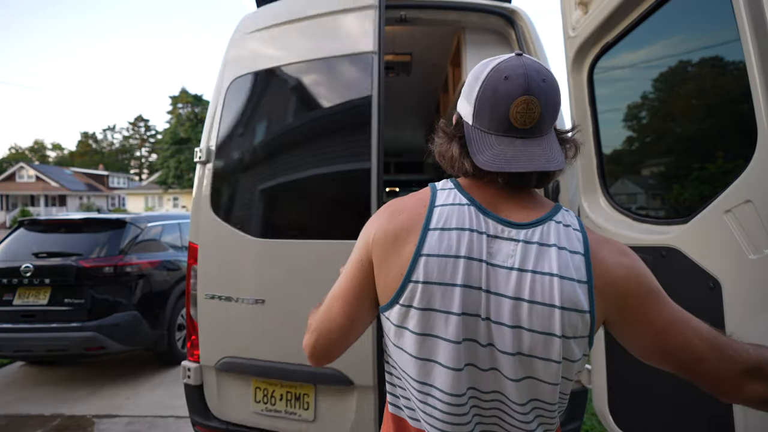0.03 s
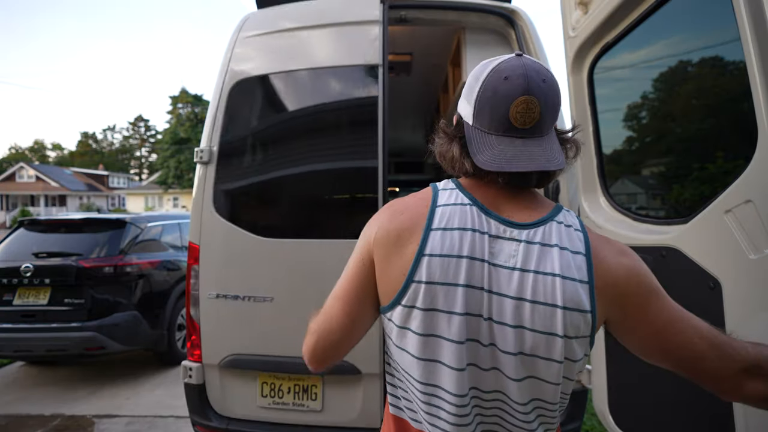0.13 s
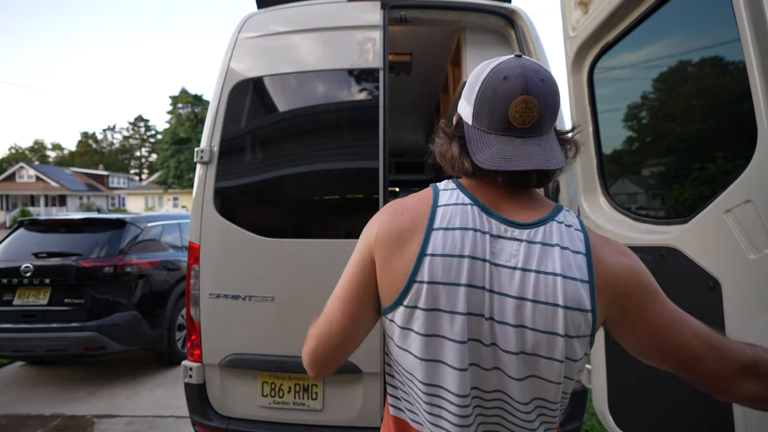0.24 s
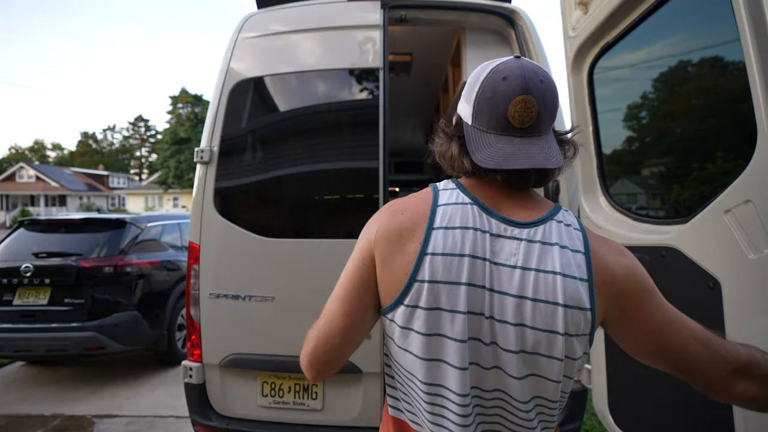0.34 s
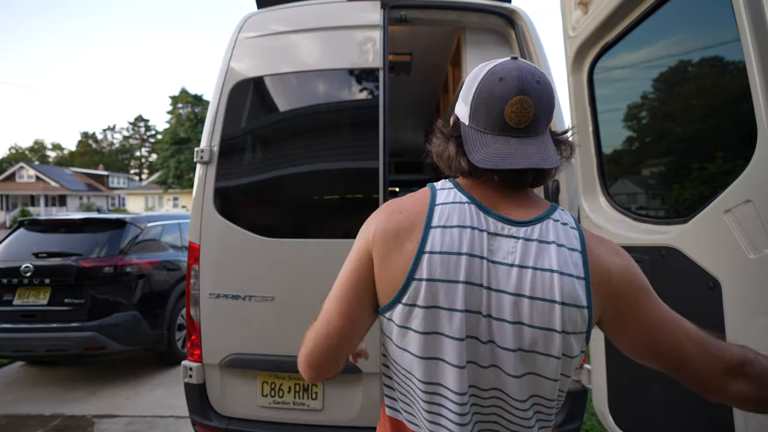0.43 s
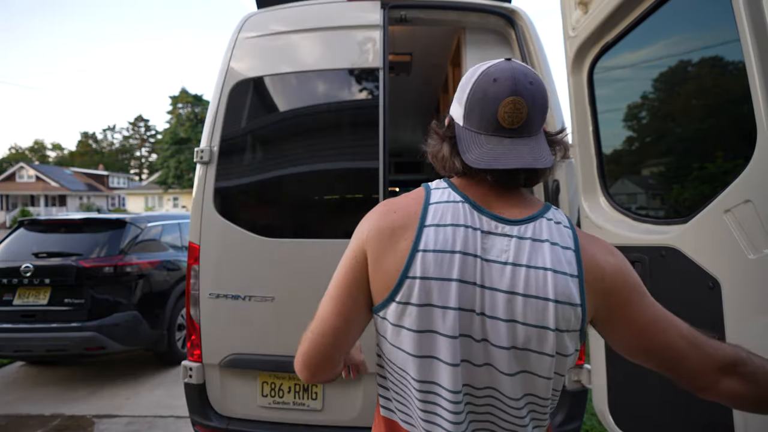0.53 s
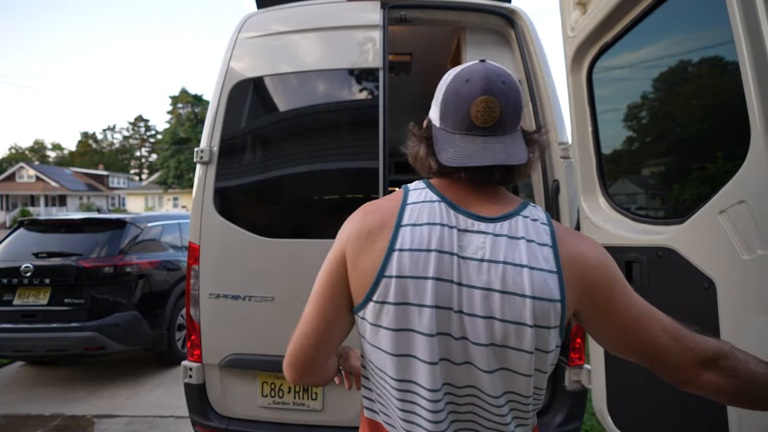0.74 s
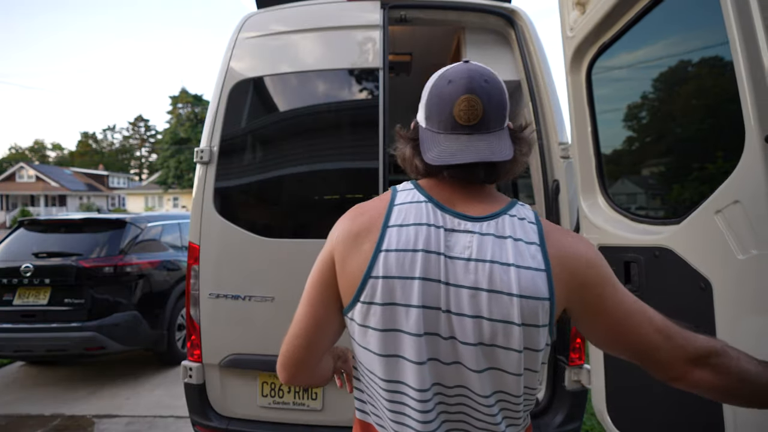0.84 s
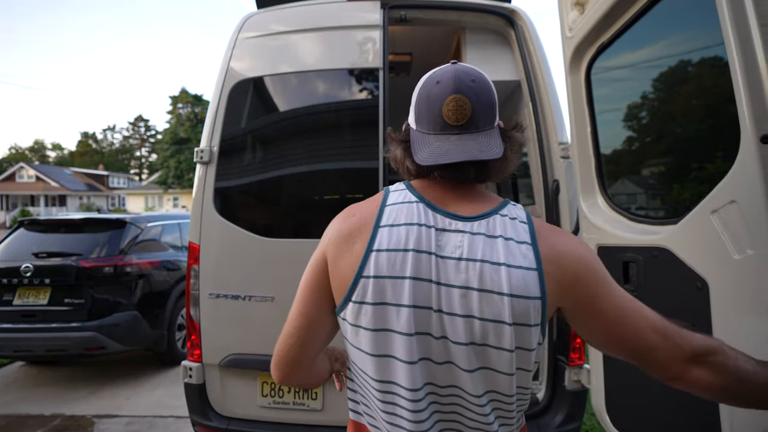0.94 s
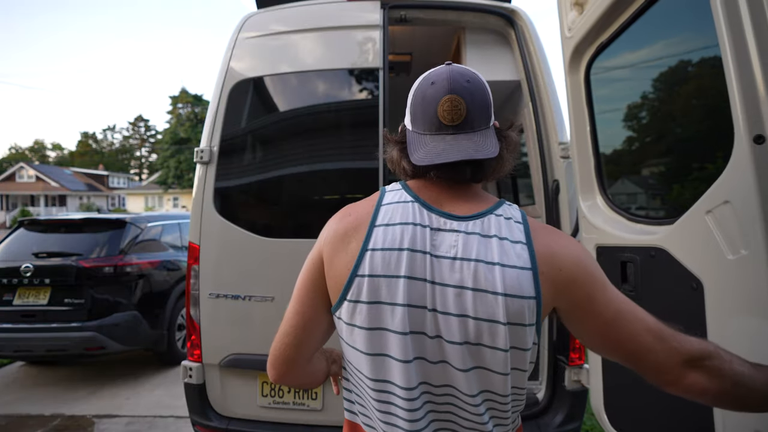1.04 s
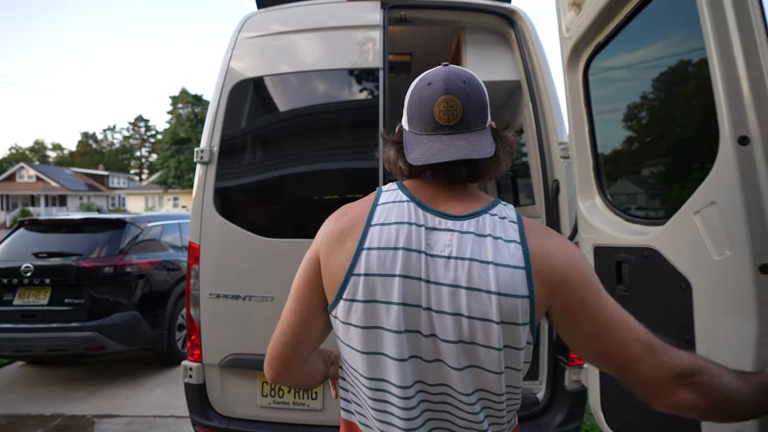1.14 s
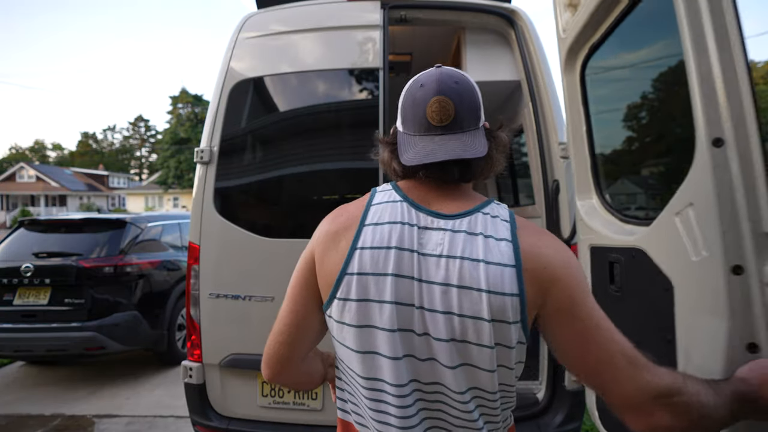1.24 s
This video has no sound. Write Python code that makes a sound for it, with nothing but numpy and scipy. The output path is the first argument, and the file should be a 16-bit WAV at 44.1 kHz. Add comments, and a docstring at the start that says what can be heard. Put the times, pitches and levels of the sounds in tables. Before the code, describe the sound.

A van's heavy rear door slams once, close and in mono. Quiet outdoor hiss runs throughout. At about 0.19 s a soft puff of air leads into a hard steel crash and latch snap at 0.22 s. Dull knocks and metallic jingling tumble until about 0.45 s, over shaking panels and hollow cargo boom. The ring fades by roughly 0.8 s with faint ticks and slight echo, leaving hiss.

```python
"""A heavy bang is heard first in a soft puff, then in full: a van's rear door slams on a driveway.
Shaped noise gives the puff of the seal, the steel crash, the latch's snap and ticks, and the shudder's
knocks and jingle. Decaying sines ring the door skin and walls and boom in the cargo space; noise in bands
shakes the body. A faint echo and steady outdoor hiss lie underneath; a limiter flattens the bang."""
import sys
import numpy as np
from scipy import signal
from scipy.fft import rfft, irfft
from scipy.io import wavfile
from scipy.ndimage import uniform_filter1d

SR = 44100
rng = np.random.default_rng(int(sys.argv[2]) if len(sys.argv) > 2 else 0)


def log_audio(samples):
    """Write samples as a 16-bit WAV file to the path given in sys.argv[1]."""
    # one column per channel
    frames = np.atleast_2d(samples).T
    # limit to full scale, then quantise
    limited = np.clip(frames, -1, 1)
    pcm = np.round(limited * 32767).astype(np.int16)
    wavfile.write(sys.argv[1], SR, pcm)


N = 57330
TIME, HZ = np.arange(N) / SR, np.fft.rfftfreq(N, 1 / SR)

# Levels and densities are relative: each source has its own gain, and the limiter acts on the sum.
SLAM_S = 0.2222  # the door meets its frame
# Modes of the door skin: (frequency [Hz], level [dB], 60 dB decay time [s])
SKIN_MODES = [(420.7, -9, 0.41), (442.7, 0, 0.34), (633.6, -5, 0.41), (719, -7.5, 0.33),
              (839.4, -2.5, 0.33), (905, -0.5, 0.21), (1114, -12, 0.75), (1424, -6.5, 0.31),
              (1465, -12.5, 0.45), (1600, -8.5, .45), (2076, -12, 0.17), (3564, -15, .24)]
SKIN_DB = -11.5
# Crash of steel on steel: (frequency [Hz], density [dB per Hz])
CRASH_SPECTRUM = [(30, -45), (190, -33), (330, 5), (520, -2), (900, -2), (1250, -3), (1950, -1),
                  (2700, -16), (4400, -11.5), (8000, -24), (10000, -37), (16000, -46)]
# Decay of the crash: (frequency [Hz], 60 dB decay time [s])
CRASH_T60 = [(200, 0.11), (1500, 0.037), (5000, 0.08), (15000, 0.051)]
CRASH_DB, CRASH_RISE_S, CRASH_HOLD_S = -6.5, 0.00276, 0.0066

# Contacts of the shuddering door with latch and frame:
# (time [s], knock level [dB], knock low-pass cutoff [Hz], rattle level [dB])
CONTACTS = [(0.2380, -17, 895, -1), (0.2476, -4.5, 1520, -4.5), (0.2705, 0.5, 1940, -1.5),
            (0.2845, -1.5, 890, -19), (0.3016, -2, 1180, -5), (0.3190, -1, 1550, -17),
            (0.3657, -5, 1710, -25), (0.371, -7.5, 1240, -14), (0.3830, -3.5, 440, -29),
            (0.39, -8.5, 800, -21), (0.4221, -17, 2770, -22), (0.4380, -16.5, 700, -36),
            (0.4668, -15.5, 348, -48), (0.5210, -25, 258, -45), (0.5480, -23, 259.7, -45)]
# Knock of a contact: (frequency [Hz], density [dB per Hz])
KNOCK_SPECTRUM = [(40, -31), (150, -4), (280, 1), (350, -6.5), (450, -1), (1500, -3.5), (5000, -12.5)]
KNOCK_DB, KNOCK_RISE_S, KNOCK_T60_S = -5.5, 0.001, 0.034
# Jingle of latch and rods: (frequency [Hz], density [dB per Hz])
RATTLE_SPECTRUM = [(100, -38), (900, -10), (2200, 4), (4200, -2), (5600, -4.5), (7800, -3.5),
                   (10000, -15.5), (16000, -33)]
RATTLE_DB, RATTLE_RISE_S, RATTLE_T60_S = -16, 0.0019, 0.14
GRAIN_S, GRAIN_DB = 0.0012, 2.5  # spacing of the jingle's tiny impacts, standard deviation of their level

# Latch snapping over its striker: (frequency [Hz], density [dB per Hz])
SNAP_SPECTRUM = [(200, -25), (800, 3), (1300, -5.5), (1850, 3.5), (2700, -7), (4500, -10), (5500, -29),
                 (8000, -26), (11000, -33), (16000, -33)]
SNAP_S, SNAP_DB, SNAP_RISE_S, SNAP_T60_S = 0.2246, -4.5, 0.00079, 0.02
# Ticks of rods and fittings settling: (time [s], level [dB])
TICK_EVENTS = [(0.4832, -40), (0.5270, -45.5), (0.5320, -47), (0.5760, -49), (0.6865, -52), (0.7155, -54)]
# Metallic colour of a tick: (frequency [Hz], density [dB per Hz])
TICK_SPECTRUM = [(1000, -25), (3000, -7), (5500, -4), (7300, 0), (8500, -4), (10000, -22), (16000, -32)]
TICK_RISE_S, TICK_T60_S = 0.001, 0.043

# Shake of the whole van body: (frequency [Hz], density [dB per Hz])
BODY_SPECTRUM = [(20, -23), (40, -4.5), (75, -3), (150, -2.5), (270, -1.5), (352, -11), (430, -4.5),
                 (600, -3.5), (1100, -8.5), (2000, -11.5), (3500, -17), (7500, -23), (10000, -35),
                 (16000, -39)]
BODY_DB = -17.5
# Build-up of the shake: (frequency [Hz], rise time [s])
BODY_RISE_TIMES = [(50, 0.077), (150, 0.057), (400, 0.026), (4000, 0.024)]
# Start of the decay after onset: (frequency [Hz], hold time [s])
BODY_HOLD_TIMES = [(50, 0.085), (160, .16), (900, 0.12), (3000, .095), (12000, 0.12)]
# Decay of the shake: (frequency [Hz], 60 dB decay time [s])
BODY_DECAY_TIMES = [(50, 0.42), (200, 0.37), (1000, 0.43), (4000, 0.46), (12000, 0.32)]
# Modes of the side and roof panels: (frequency [Hz], level [dB])
WALL_MODES = [(104, -7), (170, -2.5), (218, -7.5), (325, -1.5), (404, 0.5), (538, 0), (797, -1.5),
              (964, -2.5), (1077, -4), (1290, -6.5), (1346, -11), (2261, -14.5), (2530, -12.5)]
WALLS_DB, WALLS_RISE_S, WALLS_HOLD_S, WALLS_T60_S = -23.5, 0.037, 0.14, 0.35
# Hollow resonances of the cargo space:
# (time [s], frequency [Hz], level [dB], rise time [s], 60 dB decay time [s])
CARGO_BOOMS = [(0.239, 146.4, -24.5, 0.011, 0.79), (0.301, 275.5, -10.5, 0.0073, 0.38),
               (0.368, 149.8, -19.5, 0.0077, .15)]

# Air squeezed past the seal: (frequency [Hz], density [dB per Hz])
SEAL_SPECTRUM = [(40, -20), (130, -6), (420, 14), (1100, -5), (2200, -20), (8000, -53)]
SEAL_S, SEAL_DB, SEAL_RISE_S, SEAL_T60_S = 0.193, -29.5, 0.032, 0.069

# Echo from the houses: (frequency [Hz], density [dB per Hz])
ECHO_SPECTRUM = [(30, -4), (150, 6), (350, -4), (1100, -5.5), (2500, -16), (7500, -26), (10000, -46),
                 (16000, -40)]
ECHO_DB, ECHO_DELAY_S, ECHO_RISE_S, ECHO_HOLD_S, ECHO_T60_S = -35, 0.1, 0.1, 0.23, 0.4
# Outdoor hiss: (frequency [Hz], density [dB per Hz])
HISS_SPECTRUM = [(12, -39), (20, -14), (59, -12.5), (109, -6), (196, -4), (232, -2), (298, -6.5),
                 (324, -11), (362, -3.5), (631, -6), (746, -7.5), (1270, -8.5), (2090, -16), (7110, -29.5),
                 (15500, -50.5)]
HISS_DB = -40.5
EDGE_HZ = 15800  # upper band limit of the whole sound


def amp(db):
    """Level law: decibels to amplitude gain."""
    return 10 ** (np.asarray(db) / 20)


def read(points, hz):
    """Interpolation of a frequency table, linear along a logarithmic frequency axis."""
    f, value = np.transpose(points)
    return np.interp(np.log(hz + 1), np.log(f), value)


def add(mix, s, sound):
    """Superposition: a sound is summed into the mix from time s in seconds."""
    part = mix[round(s * SR):][:len(sound)]
    part += sound[:len(part)]


def noise(spectrum, gain=1):
    """Random-phase synthesis: noise of the given spectrum, scaled to unit RMS."""
    phase = np.exp(2j * np.pi * rng.random(len(HZ)))
    x = irfft(gain * amp(read(spectrum, HZ)) * phase, N)
    return x / x.std()


def sine(hz):
    """Simple harmonic motion of one mode, from a random phase."""
    return np.sin(2 * np.pi * (hz * TIME + rng.random()))


def envelope(rise, hold, t60):
    """Exponential damping: linear attack, then a fall of 60 dB per t60 from time hold on."""
    attack = np.minimum(TIME / rise, 1)
    return attack * np.exp(-np.log(1000) * np.maximum(TIME - hold, 0) / t60)


def dense_ring(spectrum, shape, count=10):
    """High modal density: overlapping modes act as noise, each band with its envelope shape(Hz)."""
    centres = np.geomspace(30, 15000, count)
    z = rfft(noise(spectrum))
    out = np.zeros(N)
    for hz, band in zip(centres, np.eye(count)):
        weight = read(list(zip(centres, band)), HZ)  # triangle on log frequency, crossfading with its neighbours
        out += irfft(z * weight, N) * shape(hz)
    return out


def struck_door():
    """Impact excitation: the slam rings the skin's modes at once, with a short bright crash."""
    skin = np.zeros(N)
    for hz, db, t60 in SKIN_MODES:
        skin += amp(db) * sine(hz) * envelope(CRASH_RISE_S, 0, t60)
    crash = dense_ring(CRASH_SPECTRUM, lambda hz: envelope(CRASH_RISE_S, CRASH_HOLD_S, read(CRASH_T60, hz)))
    out = np.zeros(N)
    add(out, SLAM_S, amp(SKIN_DB) * skin + amp(CRASH_DB) * crash)
    return out


def grain():
    """Amplitude modulation by tiny uneven impacts: a random gain of unit RMS, interpolated in dB."""
    level = np.interp(TIME / GRAIN_S, np.arange(N), rng.standard_normal(N))
    gain = amp(GRAIN_DB * level)
    return gain / np.sqrt(np.mean(gain ** 2))


def shudder(order=4):
    """Contact stiffness: a softer contact gives a duller knock; each one also shakes the latch."""
    out = np.zeros(N)
    shape = envelope(KNOCK_RISE_S, KNOCK_RISE_S, KNOCK_T60_S)
    for s, knock_db, cutoff_hz, rattle_db in CONTACTS:
        low_pass = 1 / np.hypot(1, (HZ / cutoff_hz) ** order)
        knock = noise(KNOCK_SPECTRUM, low_pass) * shape
        knock *= np.linalg.norm(shape) / np.linalg.norm(knock)  # same energy before the contact's level
        rattle = noise(RATTLE_SPECTRUM) * grain() * envelope(RATTLE_RISE_S, 0, RATTLE_T60_S)
        add(out, s, amp(KNOCK_DB + knock_db) * knock + amp(RATTLE_DB + rattle_db) * rattle)
    return out


def latch():
    """Impulsive contact: the latch snaps shut in a noise burst, and the fittings tick as they settle."""
    out = np.zeros(N)
    add(out, SNAP_S, amp(SNAP_DB) * noise(SNAP_SPECTRUM) * envelope(SNAP_RISE_S, SNAP_RISE_S, SNAP_T60_S))
    for s, db in TICK_EVENTS:
        add(out, s, amp(db) * noise(TICK_SPECTRUM) * envelope(TICK_RISE_S, 0, TICK_T60_S))
    return out


def body_shape(hz):
    """Frequency-dependent damping: the body's build-up, hold and decay at hz."""
    return envelope(read(BODY_RISE_TIMES, hz), read(BODY_HOLD_TIMES, hz), read(BODY_DECAY_TIMES, hz))


def van_body():
    """Structure-borne sound: the body shakes and its side and roof panels take up the motion."""
    shake = dense_ring(BODY_SPECTRUM, body_shape)
    walls = sum(amp(db) * sine(hz) for hz, db in WALL_MODES)
    walls *= envelope(WALLS_RISE_S, WALLS_HOLD_S, WALLS_T60_S)
    out = np.zeros(N)
    add(out, SLAM_S, amp(BODY_DB) * shake + amp(WALLS_DB) * walls)
    return out


def cargo_space():
    """Cavity resonance: hollow tones swell in turn and decay."""
    out = np.zeros(N)
    for s, hz, db, rise, t60 in CARGO_BOOMS:
        add(out, s, amp(db) * np.sin(2 * np.pi * hz * TIME) * envelope(rise, rise, t60))
    return out


def seal():
    """Turbulent flow: air squeezed past the seal puffs softly just before the door lands."""
    out = np.zeros(N)
    add(out, SEAL_S, amp(SEAL_DB) * noise(SEAL_SPECTRUM) * envelope(SEAL_RISE_S, SEAL_RISE_S, SEAL_T60_S))
    return out


def echo():
    """Diffuse reflection: the houses return the bang as a delayed swell of noise."""
    out = np.zeros(N)
    swell = envelope(ECHO_RISE_S, ECHO_HOLD_S, ECHO_T60_S)
    add(out, SLAM_S + ECHO_DELAY_S, amp(ECHO_DB) * noise(ECHO_SPECTRUM) * swell)
    return out


def outdoor_hiss():
    """Stationary noise: a steady hiss of fixed spectrum."""
    return amp(HISS_DB) * noise(HISS_SPECTRUM)


def scene():
    """Linear superposition of all sources in one channel."""
    background = outdoor_hiss() + echo()
    slam = seal() + struck_door()
    van = van_body() + cargo_space()
    aftermath = shudder() + latch()
    return (background + slam + van + aftermath)[None]


def record(dry, ceiling_db=-2, recover_db_per_s=250):
    """Gain reduction: a fast peak limiter with linear recovery in dB, then a low-pass band limit."""
    over_db = np.maximum(20 * np.log10(abs(dry[0]) + 1e-9) - ceiling_db, 0)
    fall = TIME * recover_db_per_s
    held_db = np.maximum.accumulate(over_db + fall) - fall  # peaks held, then released at the recovery rate
    cut_db = uniform_filter1d(held_db, size=16)  # smoothed over 16 samples
    low_pass = signal.firwin(511, EDGE_HZ, window=("kaiser", 9), fs=SR)
    return signal.oaconvolve(dry / amp(cut_db), low_pass[None], "same")


dry = scene()
out = record(dry)
log_audio(out)
```